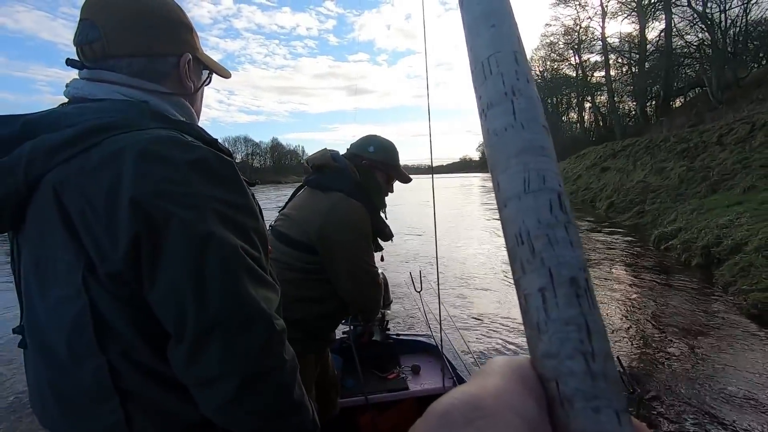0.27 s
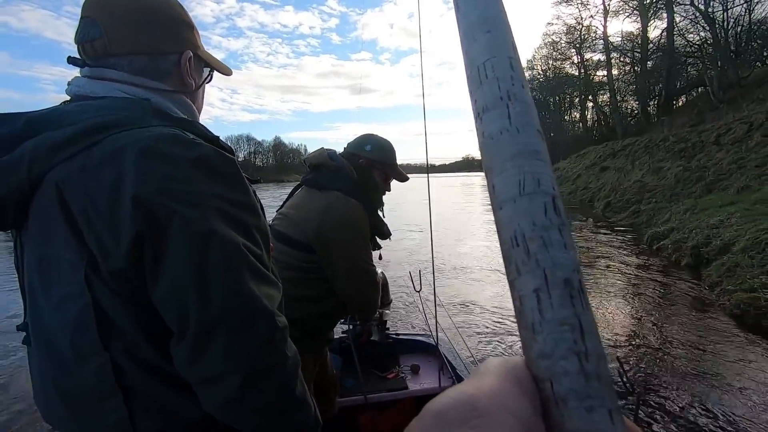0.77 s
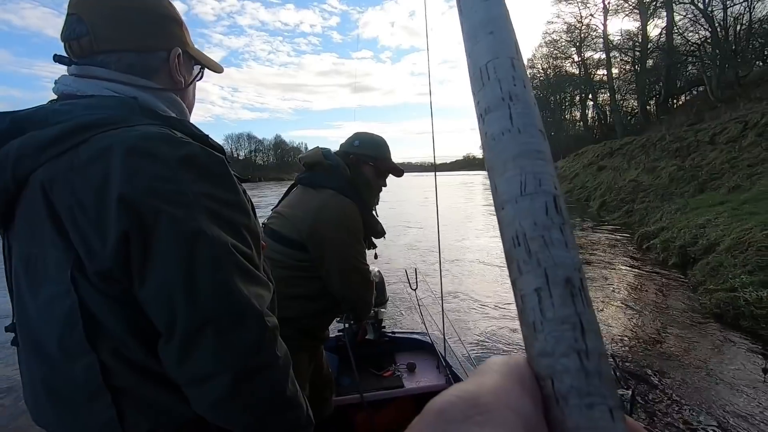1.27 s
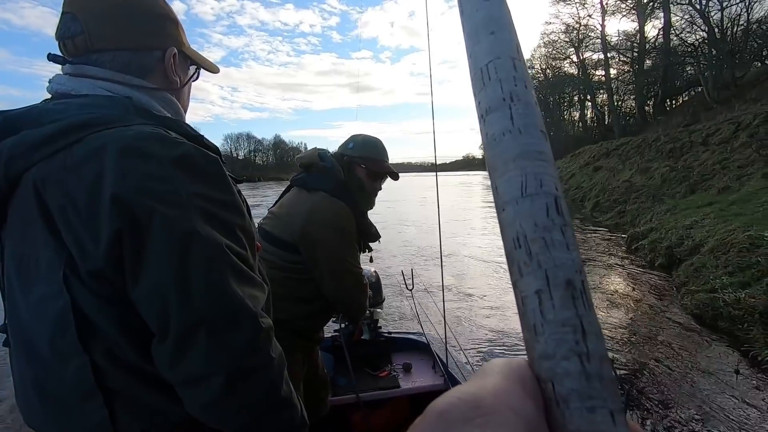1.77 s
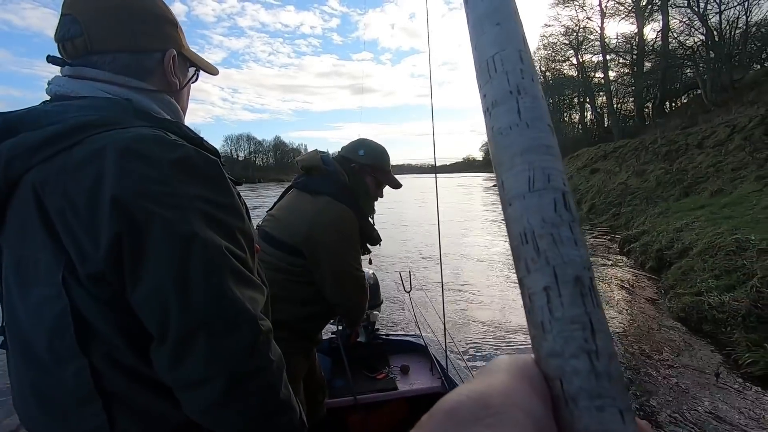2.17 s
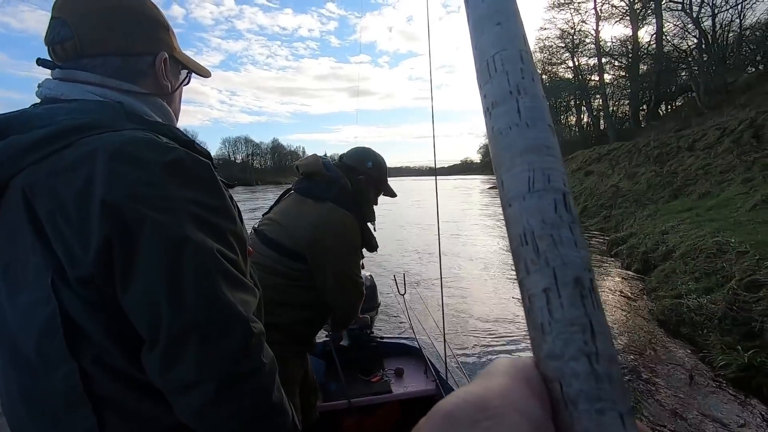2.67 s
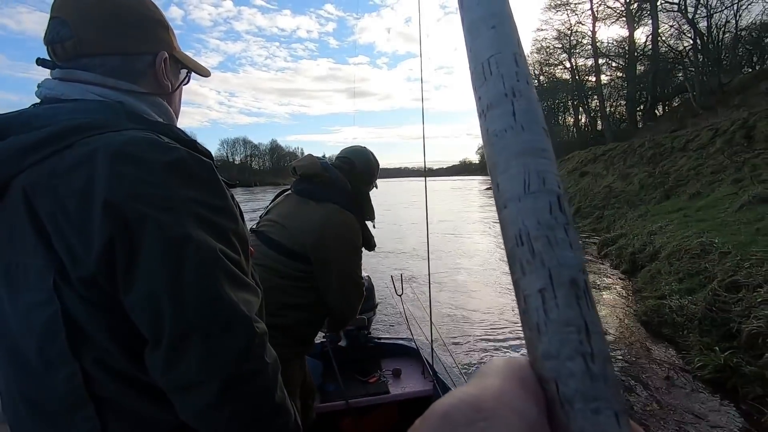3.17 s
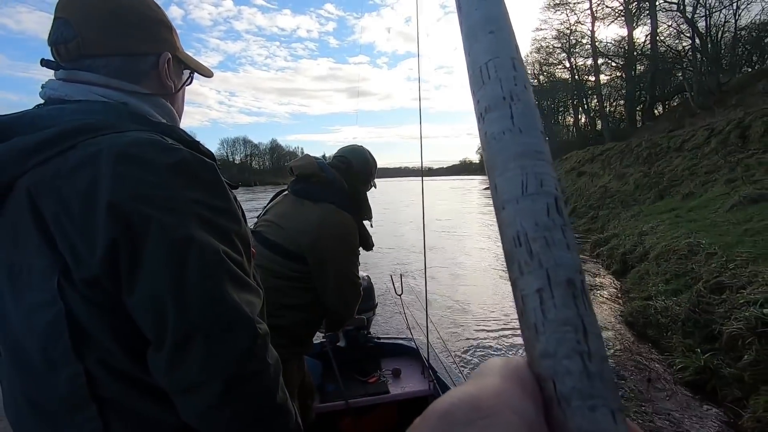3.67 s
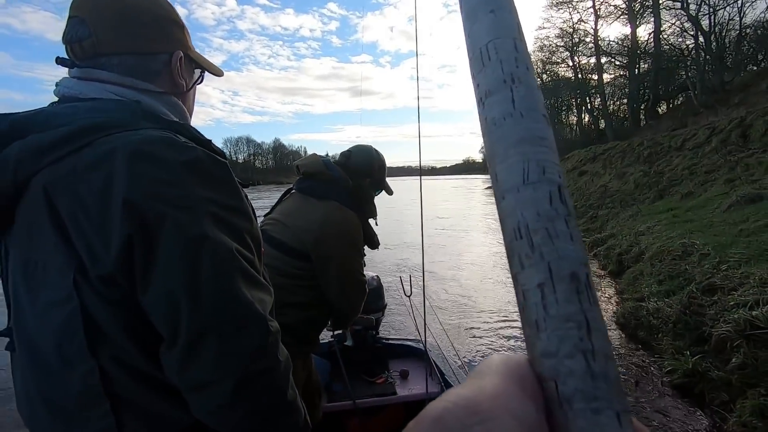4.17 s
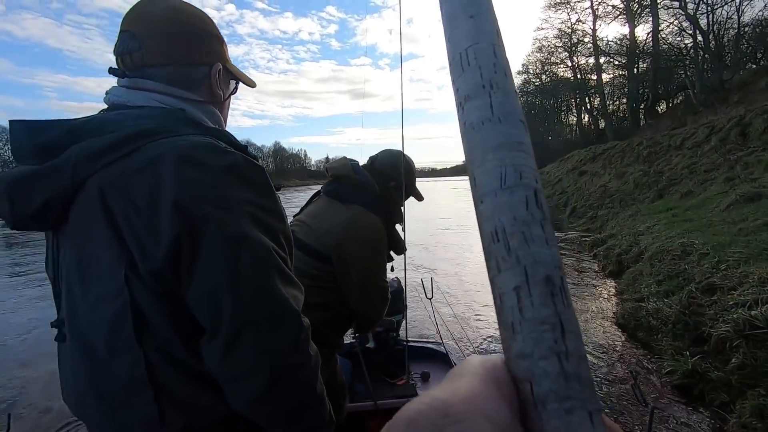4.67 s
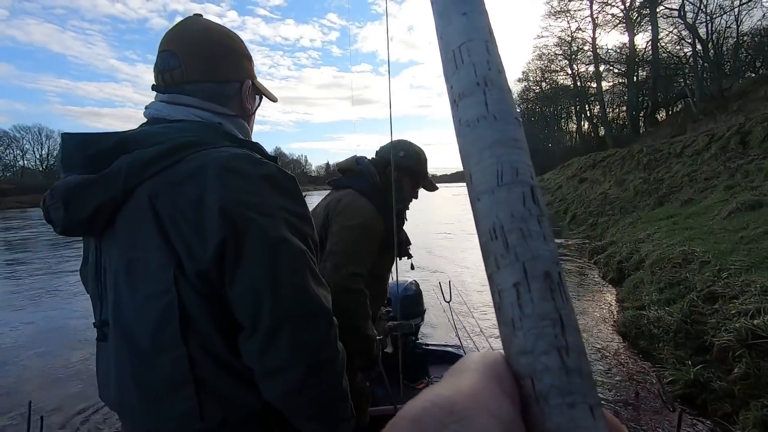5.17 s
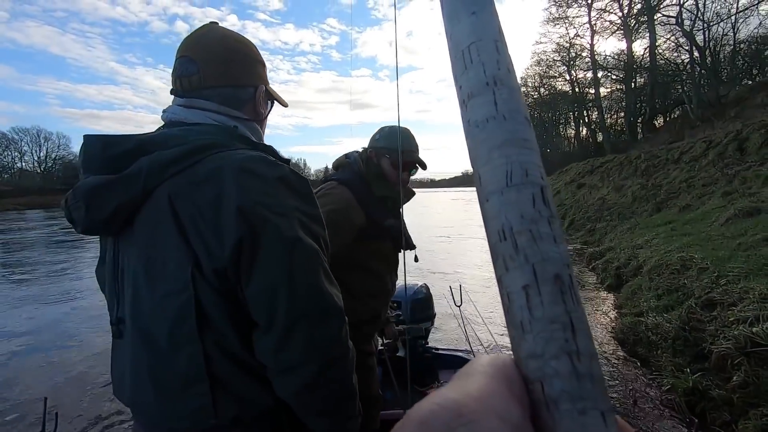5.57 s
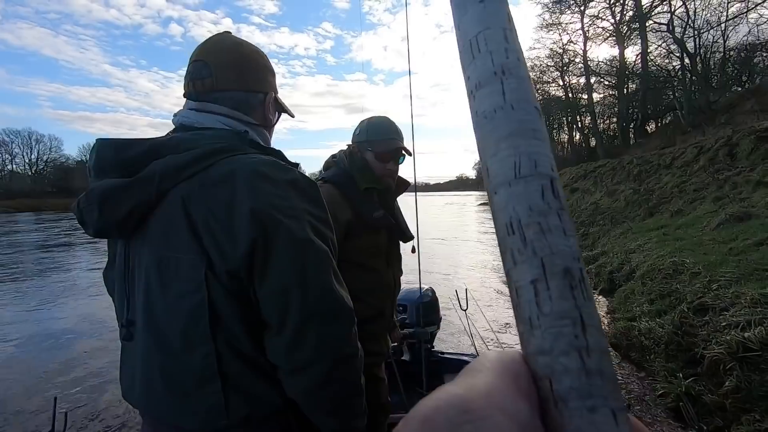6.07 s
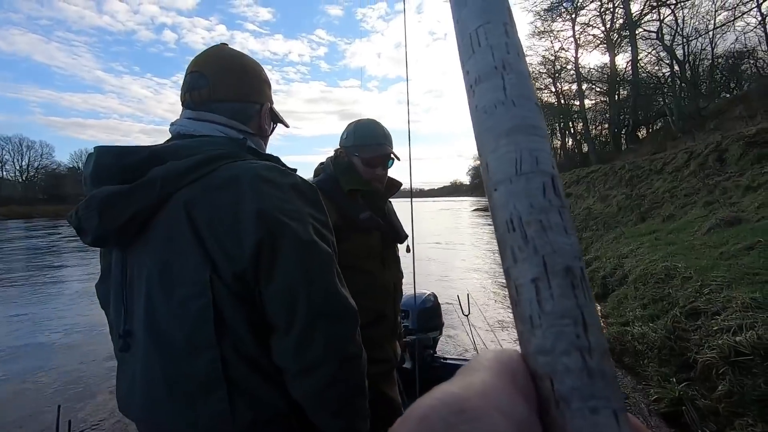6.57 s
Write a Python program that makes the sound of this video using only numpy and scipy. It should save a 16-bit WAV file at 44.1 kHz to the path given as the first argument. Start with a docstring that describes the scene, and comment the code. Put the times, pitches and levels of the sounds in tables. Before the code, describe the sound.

Close, fast ratcheting from a fishing reel speeds up and slows, while a boat's outboard motor burbles softly underneath.

```python
"""A fishing reel clicks close by on the right as line runs off it: two small catches (pawls) snap over
a 30-tooth wheel that speeds up with every tug, and the small boat echoes each click.
Behind it an outboard motor shakes the hull and blows its exhaust out under water as bubbles;
about four seconds in, it clunks out of gear and settles to a slower beat. The river hisses faintly."""
import sys
import numpy as np
from scipy import signal
from scipy.fft import rfft, irfft, next_fast_len
from scipy.io import wavfile
from scipy.ndimage import uniform_filter1d, minimum_filter1d, map_coordinates

SR = 44100
rng = np.random.default_rng(int(sys.argv[2]) if len(sys.argv) > 2 else 0)


def generate_wav(signal):
    """Clip the signal to [-1, 1] and save it as 16-bit WAV at the path in sys.argv[1]."""
    frames = np.transpose(np.atleast_2d(signal))
    scaled = np.clip(frames, -1, 1) * 32767
    pcm = np.round(scaled).astype(np.int16)
    wavfile.write(sys.argv[1], SR, pcm)


N = 301203
TIME = np.arange(N) / SR

def amp(db):
    """Turn decibels into a volume factor."""
    return 10 ** (np.asarray(db) / 20)

def unit(x):
    """Scale a sound to an average power of 1."""
    return x / np.sqrt(np.mean(x ** 2) + 1e-20)

def along(points, hz):
    """Read between the rows of a (f/Hz, value) table on a log scale."""
    f, v = np.transpose(points)
    return np.interp(np.log(hz + 1), np.log(f + 1), v)

def wobble(rate):
    """A smooth curve through `rate` random points a second."""
    return map_coordinates(rng.standard_normal(int(N * rate / SR) + 4), [TIME * rate])

def filtered(x, response):
    """Scale and delay each frequency f in x by response(f)."""
    size = next_fast_len(N + SR // 2)
    return irfft(rfft(x, size) * response(np.fft.rfftfreq(size, 1 / SR)), size)[..., :N]

def resonance(f, hz, width):
    """A filter that rings at hz; the narrower it is, the longer it rings."""
    return 1j * f * width / (hz * hz - f * f + 1j * f * width)

def place(times, sizes):
    """Add a spike of the given size at each time."""
    index = np.round(np.ravel(times) * SR).astype(int)
    return np.bincount(np.clip(index, 0, N), np.ravel(sizes), N + 1)[:N]

def cycles(rate, start):
    """The times at which a beat of changing speed comes round."""
    phase = np.cumsum(rate) / SR + start
    return np.interp(np.arange(int(phase[-1]) + 1), phase, TIME)

# Tugs on the line: peak t/s, added speed/(teeth per s), half-length/s
LINE_TUGS = [(0.018, 40.3, 0.045), (0.128, 57.7, 0.129), (0.362, 32.2, 0.115), (0.482, 49.5, 0.057),
             (0.598, 58.0, 0.053), (0.693, 28.9, 0.069), (0.873, 45.7, 0.118), (1.046, 39.5, 0.09),
             (1.15, 40.3, 0.059), (1.287, 23.5, 0.095), (1.393, 33.7, 0.034), (1.496, 51.2, 0.155),
             (1.807, 21.6, 0.089), (1.923, 36.3, 0.039), (2.055, 34.5, 0.097), (2.214, 29.9, 0.144),
             (2.433, 54.7, 0.089), (2.649, 54.5, 0.132), (2.863, 47.0, 0.069), (3.042, 55.2, 0.175),
             (3.274, 60.7, 0.07), (3.467, 53.4, 0.123), (3.715, 61.1, 0.088), (3.87, 40.8, 0.043),
             (3.962, 38.1, 0.102), (4.163, 71.1, 0.074), (4.31, 55.5, 0.044), (4.413, 45.1, 0.055),
             (4.593, 33.1, 0.077), (4.7, 66.1, 0.044), (4.834, 46.5, 0.055), (4.978, 34.2, 0.068),
             (5.119, 19.8, 0.084), (5.265, 70.3, 0.045), (5.437, 39.1, 0.054), (5.556, 53.3, 0.05),
             (5.691, 15.2, 0.102), (5.886, 46.1, 0.054), (6.034, 33.3, 0.033), (6.142, 59.3, 0.097),
             (6.392, 66.8, 0.085), (6.63, 58.2, 0.102), (6.826, 47.7, 0.046)]
TEETH, STEADY_TEETH_PER_S = 30, 20.977
def spool_speed():
    """Teeth passing per second: each tug adds a smooth surge to the steady pull."""
    surges = sum(surge * np.exp(-((TIME - s) / half) ** 2) for s, surge, half in LINE_TUGS)
    return STEADY_TEETH_PER_S + surges

def turn(tooth, peak):
    """Swing between -1 and 1 once per turn of the spool."""
    return np.cos(2 * np.pi * (tooth - peak) / TEETH)

def pawl(times, sizes, slip_ms, slip_db, rebound_ms, rebound_db):
    """A catch slips off one tooth, hits the next and bounces twice."""
    chance = rng.standard_normal((len(times), 8))
    delay_ms = np.array([-slip_ms, 0, rebound_ms, 2 * rebound_ms]) * np.exp(.28 * chance[:, :4])
    force = amp(np.array([slip_db, 0, rebound_db, 2 * rebound_db]) + chance[:, 4:] * [5.2, .6, 2.4, 11.1])
    return place(times[:, None] + delay_ms / 1000, sizes[:, None] * force)

def strikes(speed):
    """Two catches hit each tooth; the wheel is off-centre, so their gap varies over a turn."""
    first = cycles(speed, start=-.03)
    tooth = np.arange(len(first))
    pace = np.interp(first, TIME, speed) / speed.mean()
    chance = rng.standard_normal((len(first), 3))
    lag_ms = .3 + 1.5 * ((1 + turn(tooth, peak=10.5)) / 2) ** .8 * pace ** -.6
    second = first + lag_ms * np.exp(.17 * chance[:, 0]) / 1000
    size = amp(chance[:, 1]) * pace ** -.2  # a slow catch falls the full depth of the tooth
    lead = pawl(first, size, slip_ms=.5, slip_db=-13, rebound_ms=.95, rebound_db=-9)
    trail = pawl(second, size, slip_ms=.4, slip_db=-14, rebound_ms=.6, rebound_db=-7)
    return lead + amp(-3) * trail

def scattered(blows, fade_s):
    """Each hit smears into a short hiss, new every time because the spool has moved on."""
    fade = amp(-120 * np.arange(SR // 50) / SR / fade_s)
    power = signal.fftconvolve(blows ** 2, fade / fade.sum())[:N]
    return np.sqrt(np.abs(power)) * rng.standard_normal(N)

# The reel's ringing tones: f/Hz, width/Hz, relative level/dB, swing over a turn/dB, loudest tooth
REEL_TONES = [(1097, 220, -22, 1, 1.7), (1737.7, 23, -13.5, 1, 13.6), (2067, 232, -17, 1.5, 9.5),
              (3040, 1960, -21.5, 0.5, 12), (3488, 403, -13, 2.5, 18), (3860, 660, -16, 2, 16.4),
              (5310, 1740, -14.5, 1.5, 19), (6830, 780, -5.5, 0, 3.6), (7384, 317, 1, 1, 8.2),
              (8397, 624, -5, 1, 9.1), (9744, 325, -8.5, 1.5, 12), (9964, 550, -12.5, 2, 13.3),
              (12100, 5600, -34, 1.5, 3.3)]
# How the left side is muffled: f/Hz, level/dB
LEFT_SHADE = [(300, -34), (1200, -12), (1700, -15.5), (2200, -24), (2800, -2.5), (3600, -10), (5000, -5),
              (6200, -13), (7500, -14.5), (8300, -15), (9800, -3.5), (11000, -9.5), (14000, -2)]
def fishing_reel(left_lag_ms):
    """The hits make the reel ring; the left side hears it late, muffled and more scattered."""
    speed = spool_speed()
    blows = strikes(speed)
    left = amp(-2.5) * blows + amp(-3) * scattered(blows, fade_s=.01)
    right = blows + amp(-17) * scattered(blows, fade_s=.006)
    pair = np.array([left, right])
    tooth = np.cumsum(speed) / SR
    ring = np.zeros((2, N))
    for k, (hz, width, db, swing_db, peak) in enumerate(REEL_TONES):
        # the turning spool points each tone at the listener and away again
        aimed = pair * amp(db + swing_db * turn(tooth, peak))
        ring += (-1) ** k * filtered(aimed, lambda f: resonance(f, hz, width))
    shade = lambda f: amp(along(LEFT_SHADE, f)) * np.exp(-2j * np.pi * f * left_lag_ms / 1000)
    return amp(-24) * unit(np.array([filtered(ring[0], shade), ring[1]]))

# How long the boat echoes: f/Hz, time to fade by 60 dB/s
ECHO_FADES = [(300, 0.14), (1500, 0.019), (4000, 0.024), (8000, 0.069), (14000, 0.014)]
# How strongly it echoes: f/Hz, relative level/dB
ECHO_LEVELS = [(500, -29), (1500, -4), (3500, -6.5), (8000, -23), (10500, -20), (12000, -11)]
def boat_echo(pair):
    """Add the echo that hull and seats throw back 4 ms after each click."""
    sent = filtered(pair[1], lambda f: amp(along(ECHO_LEVELS, f) - 3.5))
    delayed = np.pad(sent, (SR // 250, 0))
    hz, t, noise = signal.stft(rng.standard_normal((2, SR // 6)), SR, nperseg=128)
    fade = amp(-60 * t / along(ECHO_FADES, hz)[:, None])
    tail = signal.istft(noise * fade, SR, nperseg=128)[1]
    tail /= np.linalg.norm(tail, axis=1, keepdims=True)
    return pair + signal.fftconvolve(delayed[None], tail, axes=1)[:, :N]

SHIFT_S, SHIFT_TAKES_S, SETTLE_S = 4.25, .2, 2.0
def by_state(values, at=TIME):
    """Glide through three motor values: in gear, faltering, idling."""
    return np.interp(at, SHIFT_S + np.array([0, SHIFT_TAKES_S, SHIFT_TAKES_S + SETTLE_S]), values)

FIRINGS_PER_S, PUFF_HZ = (24, 18.7, 18.7), (155.4, 136, 121.5)
PUFF_DB, THROB_DB = (-46.5, -58.5, -40), (-50.5, -55, -52)
# The hull's deep tones: f/Hz, width/Hz, relative level/dB
HULL_TONES = [(24, 4.2, -43), (48, 3, -4.5), (74, 6.6, 0), (128, 12.6, -5.5)]
def outboard(puff_fade_s, rise_per_s, pitch_scatter):
    """Each firing shakes the hull and blows a puff under water that climbs in pitch as it rises."""
    firings = cycles(by_state(FIRINGS_PER_S), start=.71)
    chance = rng.standard_normal((len(firings), 4))
    t = np.arange(SR // 8) / SR
    pitch = by_state(PUFF_HZ, firings) * np.exp(pitch_scatter * chance[:, 0])
    phase = 2 * np.pi * pitch[:, None] * (t + rise_per_s * t * t / 2)
    fade_in = (1 - np.exp(-t / .0084)) ** 2
    puffs = np.sin(phase) * amp(2.7 * chance[:, 1:2] - 60 * t / puff_fade_s) * fade_in
    burble = place((firings + .00093 * chance[:, 2])[:, None] + t, puffs)
    kicks = place(firings, amp(2 * chance[:, 3]))
    hull = lambda f: sum(amp(db) * resonance(f, hz, width) for hz, width, db in HULL_TONES)
    throb = filtered(kicks, hull)
    return amp(by_state(PUFF_DB)) * unit(burble) + amp(by_state(THROB_DB)) * unit(throb)

# The water's wash, low to high: f/Hz, relative level/dB
WATER_LEVELS = [(25, -3), (100, 2), (200, 5.5), (310, -8.5), (450, -13), (750, -15), (1200, -11),
                (2500, -13), (6000, -40.5), (10000, -39), (12500, -42)]
# How alike it is left and right: f/Hz, likeness (1 = the same)
WATER_LIKENESS = [(100, 0.93), (250, 0.97), (500, 0.35), (2000, 0.081)]
def river():
    """Water washes along the hull and bank, swelling gently."""
    spread = lambda f: np.arccos(np.clip(along(WATER_LIKENESS, f), -1, 1)) / 2
    colour = lambda f: amp(along(WATER_LEVELS, f)) * [np.cos(spread(f)), np.sin(spread(f))]
    mid, side = filtered(rng.standard_normal((2, N)), colour)
    swell_db = .8 * wobble(2.5) + 1.2 * wobble(14)
    return unit(np.array([mid + side, mid - side])) * amp(-44.5 + swell_db)

# Big exhaust bubbles: start t/s, length/s, starting f/Hz, level/dB
BIG_BUBBLES = [(.06, 0.098, 193, -31.5), (0.201, 0.11, 199.6, -40), (.19, .13, 165.3, -39),
               (.33, .15, 153.4, -37), (.5, 0.18, 169.5, -35.5), (.83, .1, 190, -36.5),
               (1.02, 0.36, 167, -39.5), (1.18, 0.18, 184.9, -36), (1.31, 0.27, 146.7, -38.5),
               (1.83, 0.13, 191.5, -36), (2.0, 0.16, 173, -35), (2.16, .14, 175, -34),
               (2.3, .11, 172.3, -32.5), (2.52, .28, 174, -35), (2.98, 0.087, 201.6, -34.5),
               (3.46, 0.15, 178, -37.5), (4.0, 0.093, 168, -39), (5.29, 0.11, 189, -40)]
DEEP_HZ, SURFACING_S = 168, .13
def big_bubbles(waver, flutter_db):
    """Gas gathers under the boat in bubbles; those above DEEP_HZ are near the surface and glide up."""
    drift, flutter = wobble(40), wobble(45)
    sound = np.zeros(N)
    for s, length, first_hz, db in BIG_BUBBLES:
        now = (TIME > s) & (TIME < s + length)
        age = TIME[now] - s
        climb_hz = max(first_hz - DEEP_HZ, 0) * np.expm1(age / SURFACING_S)
        pitch = (first_hz + climb_hz) * (1 + waver * drift[now])
        swell = np.sqrt(np.abs(np.sin(np.pi * age / length))) * amp(db + flutter_db * flutter[now])
        sound[now] += np.sin(2 * np.pi * np.cumsum(pitch) / SR) * swell
    return sound

# Knocks of the gears: t/s, relative level/dB
GEAR_KNOCKS = [(4.012, -55), (4.175, -41.5), (4.222, -48)]
# The tones in one knock: f/Hz, relative level/dB, time to fade by 60 dB/s
KNOCK_TONES = [(67, -4, .09), (138, 1, .06), (203, -2, 0.14), (520, -6, 0.036)]
def gear_clunks():
    """The gear change knocks through the hull."""
    t = np.arange(SR // 4) / SR
    ring = sum(np.sin(2 * np.pi * hz * t) * amp(db - 60 * t / fade_s) for hz, db, fade_s in KNOCK_TONES)
    times, db = np.transpose(GEAR_KNOCKS)
    return signal.fftconvolve(place(times, amp(db + 8)), ring)[:N]

def scene():
    """The nearby reel over the river and the motor, which sits slightly to the right."""
    motor = outboard(puff_fade_s=.07, rise_per_s=10, pitch_scatter=.03)
    motor += big_bubbles(waver=.02, flutter_db=1) + gear_clunks()
    reel = boat_echo(fishing_reel(left_lag_ms=.2885))
    return reel + motor * amp([[-.4], [.4]]) + river()

# Softening of the highest sounds: f/Hz, level/dB
TREBLE_CUT = [(13500, -1), (14300, -8), (15500, -3.5), (16500, -26)]
CEILING_DB, TOP_HZ = -5.3, 16800
def record(dry):
    """A fast limiter turns both sides down under loud clicks; then the highest treble is cut."""
    needed = np.minimum(1, amp(CEILING_DB) / (np.abs(dry).max(axis=0) + 1e-9))
    gain = uniform_filter1d(minimum_filter1d(needed, size=65), size=33)
    return filtered(dry * gain, lambda f: amp(along(TREBLE_CUT, f)) * (f < TOP_HZ))

dry = scene()
out = record(dry)
generate_wav(out)
```